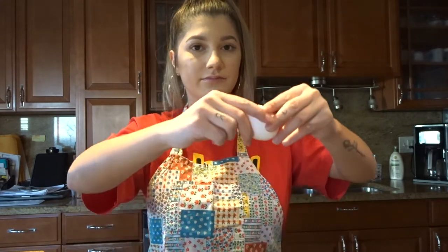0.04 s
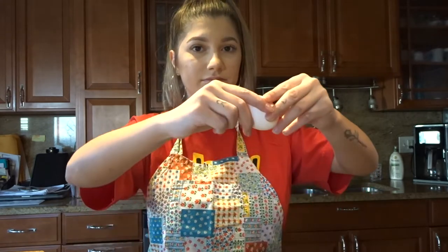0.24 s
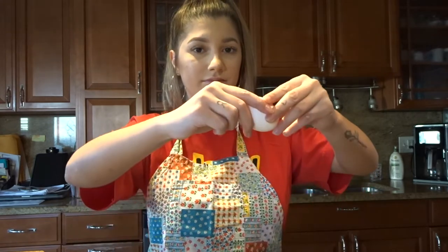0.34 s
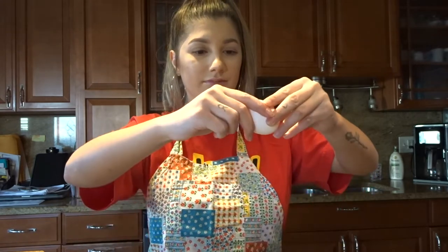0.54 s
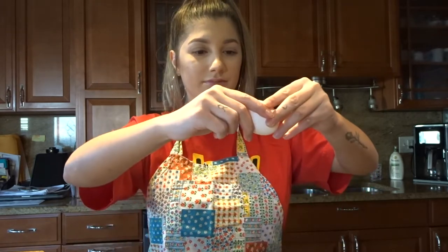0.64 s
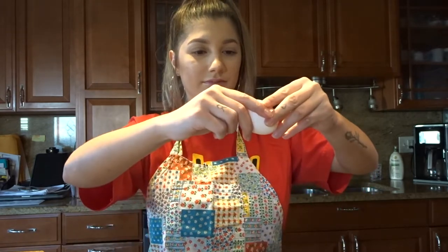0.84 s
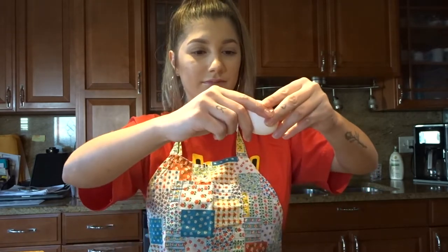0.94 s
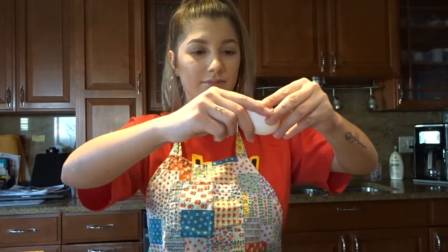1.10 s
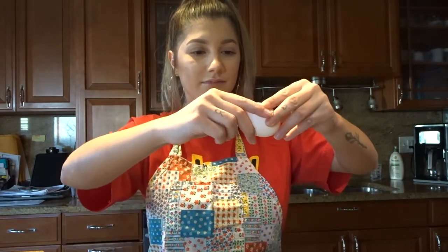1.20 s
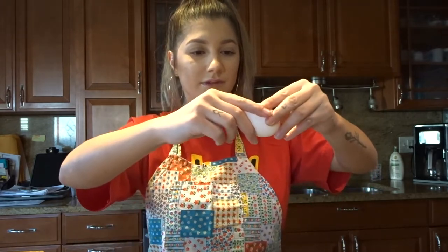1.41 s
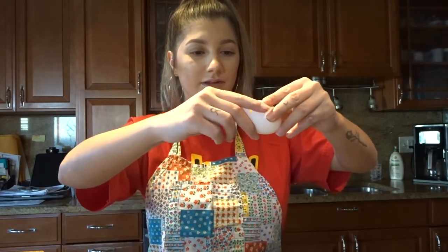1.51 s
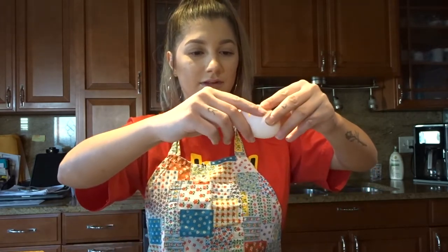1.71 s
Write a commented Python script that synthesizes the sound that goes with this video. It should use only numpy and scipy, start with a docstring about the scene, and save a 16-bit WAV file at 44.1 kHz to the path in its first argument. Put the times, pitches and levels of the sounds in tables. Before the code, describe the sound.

Fingers break an eggshell open, making crisp, irregular cracks and small crackles indoors.

```python
"""Cracking an eggshell

Fingers press an eggshell apart about a metre away in a quiet kitchen. Every fracture is a sharp
snap that briefly rings two resonances of the shell; between the snaps the broken edges crumble.
The counter top bounces each snap back, the room adds a short tail, and ventilation murmurs below."""
import sys
import numpy as np
from scipy import signal
from scipy.fft import rfft, irfft, next_fast_len
from scipy.io import wavfile

SR = 44100
rng = np.random.default_rng(int(sys.argv[2]) if len(sys.argv) > 2 else 0)


def dump_mix(stems):
    """Bounce the given channels to the path in sys.argv[1] as a 16-bit WAV at rate SR."""
    frames = np.atleast_2d(stems).T  # one column per channel
    limited = np.clip(frames, -1, 1)  # hard clip at full scale
    pcm = np.round(limited * 32767).astype(np.int16)
    wavfile.write(sys.argv[1], SR, pcm)


N = 77175

# cue list of fractures, levels before EQ (time [s], snap level [dB], snap tilt [dB/octave],
# low ring [Hz], its level [dB], high ring [Hz], its level [dB], twin re ring [dB], ring T60 [s])
FRACTURES = [ (0.04, -22.5, -10, 1530, -45, 2980, -46, -24, 0.019),
             (0.0657, -28.5, -10, 1490, -53, 3100, -54, -13, .014),
             (0.1335, -18.5, -7.5, 1530, -43, 3620, -41, 4, 0.0077),
             (0.191, -33, -6, 1500, -51, 2780, -49, -13, 0.013),
             (0.2236, -18, -1, 2600, -43, 3700, -39, -10, 0.022),
             (.2378, -13.5, -2.5, 2550, -38.5, 3580, -42.5, -8, 0.02),
             (.2601, -16.5, -3.5, 1460, -40, 2860, -61, -16, 0.014),
             (0.2681, -22, 4, 1130, -38.5, 2600, -65, -12, 0.011),
             (0.2711, -16.5, -0.5, 1530, -52, 2500, -69, 0, 0.011),
             (0.3532, -20, -2, 1400, -37, 2820, -33.5, -13, 0.0099),
             (.3760, -14, 0, 1550, -37, 2800, -42, -0.5, 0.012),
             (0.379, -23, -13, 1500, -47, 2820, -40, 10, 0.007),
             (0.4145, -26, 4, 1420, -34, 2720, -46, -24, 0.0068),
             (0.421, -12, 4.5, 1435, -39, 2780, -33, -1, 0.018),
             (0.4584, -14.5, -6, 2570, -36.5, 3620, -37, -10, 0.016),
             (0.533, -35, 10, 1480, -48, 2760, -42.5, -1, 0.023),
             (.5455, -33, 1, 1410, -44.5, 2720, -52, -8, 0.012),
             (0.5674, -26.5, -7, 1490, -41.5, 3100, -54, -11, 0.021),
             (.6120, -3.5, -0.5, 1260, -30, 2850, -20.5, -0.5, 0.0095),
             (.7070, -38, -4, 1540, -45.5, 2900, -43, -21, .014),
             (.7812, -12, 8, 1480, -42, 2890, -36.5, -15, 0.011),
             (0.8191, -4.5, -1.5, 1432, -29.5, 2517, -25.5, 2, 0.015),
             (0.9202, -19, 3, 1520, -42, 2960, -59, 0, 0.013),
             (0.9477, 3.5, 0, 1675, -30.5, 2912, -19, -9, 0.025),
             (.9940, -20, 3, 1580, -66, 2940, -39, -6, 0.019),
             (1.06, -26, 7, 1650, -47, 2970, -40.5, -17, .018),
             (1.1017, -26, 7, 1840, -51, 3580, -48, -13, 0.021),
             (1.1096, -7.5, 2, 1650, -22.5, 2870, -34, -1, 0.013),
             (1.2480, -27.5, -4, 1660, -55, 3010, -42.5, -21, 0.02),
             (1.2781, -22.5, -4.5, 1645, -35.5, 2950, -43, 0.5, 0.013),
             (1.3332, -32.5, 10.5, 1550, -43, 3060, -44, -15, 0.011),
             (1.3354, -29.5, -15, 1630, -39.5, 2960, -37.5, -16, 0.017),
             (1.3567, -35, -14.5, 1550, -66, 1960, -43, -16, 0.014),
             (1.4390, -28.5, -6, 1930, -43, 3080, -52, -4, 0.028),
             (1.4591, -33, 0, 1915, -36.5, 3190, -43.5, -8, 0.029),
             (1.4757, -30, 3, 1990, -70, 2970, -38.5, -8, .013),
             (1.4855, -21.5, -3, 2050, -46, 3280, -47, -4, 0.026),
             (1.4899, -29.5, 14, 2070, -38, 3060, -47, -21, 0.021),
             (1.5110, -32, -9, 2100, -43, 3250, -43, -13, 0.02),
             (1.5215, -28, -2, 2030, -42.5, 3180, -50, 1, 0.018),
             (1.5345, -33, 8, 2220, -53, 2900, -40.5, -6, 0.01),
             (1.549, -21.5, 9.5, 2120, -39.5, 3130, -35.5, -3.5, 0.011),
             (1.6030, -42, -3, 2110, -51, 3130, -50, -11, 0.013),
             (1.6120, -31, -9, 2070, -52, 3060, -49, -3, 0.019),
             (1.6310, -27, -13, 2130, -50, 3070, -51, -2, 0.027),
             (1.6365, -36, -27, 2100, -57, 3730, -52, -16, 0.036),
             (1.7040, -41, 16, 2100, -48, 3460, -57, -5, 0.021)]
# tone of a snap (frequency [Hz], gain [dB])
SNAP_EQ = [(100, -4), (400, -16), (900, -28), (1400, -13.5), (2400, -2), (3500, 0.5), (5000, -1.5),
           (6600, -1.5), (8500, -5), (11000, -10.5)]
# fader ride of the crumbling edges (time [s], level [dB])
CRUMBLE_RIDE = [(0, -62.5), (.2, -68.5), (0.263, -50.5), (.32, -65.5), (.39, -50), (.46, -53.5), (.53, -60),
                (.75, -66), (0.847, -48.5), (.91, -66), (1.05, -58.5), (1.219, -62), (1.42, -85),
                (1.49, -56), (1.57, -64), (1.75, -72)]
# tone of a crumb (frequency [Hz], relative level [dB])
CRUMB_EQ = [(200, -26.5), (900, -3), (1500, 1.5), (2200, 5), (3100, 3.5), (4500, -2.5), (7000, -11),
            (11000, -10.5)]
# length of the kitchen's tail (frequency [Hz], T60 [s])
TAIL_T60 = [(300, .3), (1200, 0.31), (3000, 0.53), (7000, 0.57), (11000, 0.4)]
# tone of the tail (frequency [Hz], gain [dB])
TAIL_EQ = [(300, 4), (1400, 1), (3000, -6.5), (6000, -4.5), (11000, 0)]
# stereo image of the tail (frequency [Hz], left-right correlation [0..1])
TAIL_CORRELATION = [(300, 0.57), (2500, 0.71), (5000, 0.15), (10000, 0.11)]
# pan of the egg (frequency [Hz], left minus right [dB])
EGG_PAN = [(500, -5.5), (1500, -1.5), (2900, 1), (5000, -0.7), (10000, -1)]
# tone of the ventilation's air (frequency [Hz], relative level [dB])
AIR_EQ = [(15, -80), (25, -52), (64, -33), (165, -24.5), (218, -12), (422, -5), (668, 0.5), (1360, -8.5),
          (1550, -7.5), (1850, -15), (2000, -7), (2640, -8.5), (3000, -8), (4750, -11.5), (11000, -22.5),
          (14300, -12.5), (22000, -120)]
# stereo image of the air (frequency [Hz], left-right correlation [0..1])
AIR_CORRELATION = [(60, 0.82), (250, 0.97), (1200, 0.77), (3000, 0.29), (6000, 0.12), (11000, 0.067)]
# fan tones (frequency [Hz], rms level [dB])
FAN_TONES = [(376, -78.5), (669, -71)]

SPLINTER_SHARE, SPLINTER_T60_S = 0.31, 0.012  # share of a snap's energy in trailing micro-fractures
TILT_PIVOT_HZ = 5170
TWIN_RATIO = 1.147  # the oval shell splits each resonance into a pair
RADIATE_HZ = 1240  # the small shell radiates little below this
CRUMBS_PER_S, CRUMB_SPREAD_DB = 1200, 5.5
COUNTER_S, COUNTER_DB, COUNTER_EDGE_HZ = 0.00525, -13.5, 980  # the bounce is mostly treble
EARLY_DB, EARLY_T60_S, TAIL_ONSET_S = 1.5, 0.12, 0.0018  # nearby cabinets thicken the tail's start
LEFT_LAG_S = 0.000013
AIR_DB, AIR_LOWCUT_HZ = -55.5, 23
HIGHCUT_HZ = 11080


def fracture(snap_db, tilt_db, low_hz, low_db, high_hz, high_db, twin_db, t60, size=2048):
    """The shell gives way: a snap with a trail of splinters rings two pairs of resonances."""
    t = np.arange(size) / SR
    force = rng.standard_normal(size) * amp(-60 * t / SPLINTER_T60_S)
    force *= np.sqrt(SPLINTER_SHARE) / np.linalg.norm(force)
    force[0] += np.sqrt(1 - SPLINTER_SHARE)  # the leading transient
    phase = np.angle(rfft(force, 2 * size))
    force = irfft(np.exp(1j * phase))[:size]  # scattered in time, even in spectrum
    tilt = lambda hz: tilt_db * np.log2(np.maximum(hz, high_hz) / TILT_PIVOT_HZ)
    click = eq_impulse(lambda hz: curve(SNAP_EQ, hz) + tilt(hz))
    snap = amp(snap_db) * signal.fftconvolve(force, click)[:size]
    mode = lambda hz, db: amp(db - 60 * t / t60) * np.cos(2 * np.pi * hz * t)
    pair = lambda hz, db: mode(hz, db) - mode(hz * TWIN_RATIO, db + twin_db)
    ring = pair(low_hz, low_db) + pair(high_hz, high_db)
    lowcut = signal.butter(4, RADIATE_HZ, 'high', fs=SR, output='sos')
    return -signal.sosfilt(lowcut, snap + ring)


def cracking_shell():
    """The lead layer: each fracture fires on its cue and sounds through the kitchen."""
    track = np.zeros((2, N))
    for start, *settings in FRACTURES:
        mix_in(track, start, kitchen(fracture(*settings)))
    return track


def crumbling():
    """The broken edges rub: a crackle of tiny grains of uneven size."""
    sizes = rng.choice([-1, 1], N) * amp(CRUMB_SPREAD_DB * rng.uniform(-2.1, 2.3, N))
    grains = (rng.random(N) < CRUMBS_PER_S / SR) * sizes
    crumb = eq_impulse(lambda hz: curve(CRUMB_EQ, hz))
    crackle = unit_rms(signal.fftconvolve(grains, crumb)[:N])
    fader = amp(np.interp(np.arange(N) / SR, *np.transpose(CRUMBLE_RIDE)))
    return kitchen(crackle * fader)[:, :N]


def kitchen(x):
    """Mono in, stereo out: direct sound, the bounce off the counter and a fresh diffuse tail."""
    size = SR // 3
    hz, t, bands = signal.stft(stereo_noise(TAIL_CORRELATION, size), SR, nperseg=128)
    decay = amp(-60 * t / curve(TAIL_T60, hz)[:, None]) + amp(EARLY_DB - 60 * t / EARLY_T60_S)
    band_energy = size * np.mean(decay ** 2, axis=1, keepdims=True)
    decay *= amp(curve(TAIL_EQ, hz))[:, None] / np.sqrt(band_energy)
    room = signal.istft(bands * decay, SR, nperseg=128)[1][:, :size]
    room *= 1 - np.exp(-np.arange(size) / SR / TAIL_ONSET_S)
    bounce = eq_impulse(lambda f: COUNTER_DB - 10 * np.log10(1 + (COUNTER_EDGE_HZ / (f + 100)) ** 2))
    mix_in(room, COUNTER_S, np.array([bounce, bounce]))
    room[:, 0] += 1  # direct sound
    return signal.fftconvolve(x[None], room, axes=1)


def panned(x):
    """Level and time differences between the channels set the egg slightly to the right."""
    side = np.array([[0.5], [-0.5]])
    delay = lambda hz: np.exp(-2j * np.pi * hz * side * LEFT_LAG_S)
    return filtered(x, lambda hz: amp(side * curve(EGG_PAN, hz)) * delay(hz))


def ventilation():
    """The bed: steady air noise with faint, slightly unsteady fan tones."""
    colour = lambda hz: amp(curve(AIR_EQ, hz)) * hz / np.hypot(hz, AIR_LOWCUT_HZ)
    air = unit_rms(filtered(stereo_noise(AIR_CORRELATION, N), colour))
    t = np.arange(N) / SR
    drift = lambda: 3 * np.cumsum(rng.standard_normal(N)) / np.sqrt(SR)  # wandering phase
    hum = sum(amp(db) * unit_rms(np.sin(2 * np.pi * hz * t + drift())) for hz, db in FAN_TONES)
    return amp(AIR_DB) * air + hum


def amp(db):
    """Decibels to gain."""
    return 10 ** (np.asarray(db) / 20)


def unit_rms(x):
    """Normalise to rms 1."""
    return x / np.sqrt(np.mean(x ** 2) + 1e-20)


def curve(points, hz):
    """Read (frequency, value) breakpoints on a log frequency axis."""
    freqs, values = np.transpose(points)
    return np.interp(np.log(hz + 1), np.log(freqs + 1), values)


def filtered(x, response):
    """Apply a frequency response to x."""
    size = x.shape[-1]
    padded = next_fast_len(size + 4096)
    hz = np.fft.rfftfreq(padded, 1 / SR)
    return irfft(rfft(x, padded) * response(hz), padded)[..., :size]


def eq_impulse(level_db, size=1024):
    """Minimum-phase click with the given EQ curve."""
    hz = np.fft.rfftfreq(size, 1 / SR)
    cepstrum = irfft(np.log(amp(level_db(hz))))
    cepstrum[1:size // 2] *= 2
    cepstrum[size // 2 + 1:] = 0
    return irfft(np.exp(rfft(cepstrum)))


def stereo_noise(correlation, size):
    """White noise whose stereo width follows a left-right correlation curve."""
    angle = lambda hz: np.arccos(curve(correlation, hz)) / 2
    mid_side_gains = lambda hz: np.array([np.cos(angle(hz)), np.sin(angle(hz))])
    mid, side = filtered(rng.standard_normal((2, size)), mid_side_gains)
    return np.array([mid + side, mid - side])


def mix_in(track, start_s, sound):
    """Drop a sound onto the track at its start time."""
    i = round(start_s * SR)
    part = track[:, i:i + sound.shape[-1]]
    part += sound[:, :part.shape[-1]]


def scene():
    """The mix: snaps and crumbs over the ventilation bed."""
    return panned(cracking_shell() + crumbling()) + ventilation()


def record(dry):
    """A brick-wall high cut takes off the top octave."""
    return filtered(dry, lambda hz: 1 / np.sqrt(1 + (hz / HIGHCUT_HZ) ** 220))


dry = scene()
out = record(dry)
dump_mix(out)
```